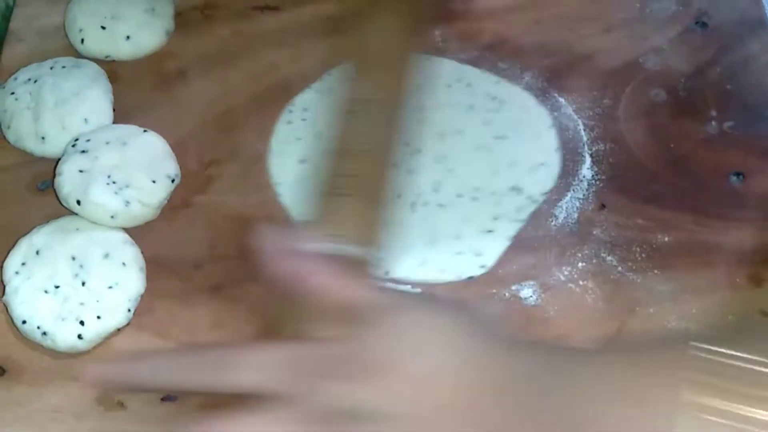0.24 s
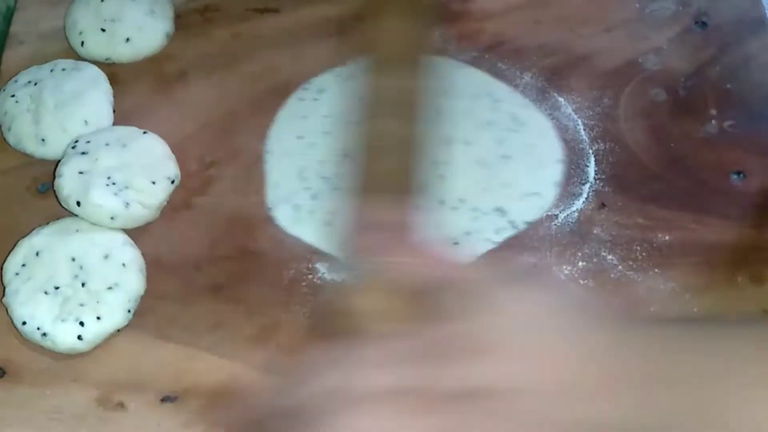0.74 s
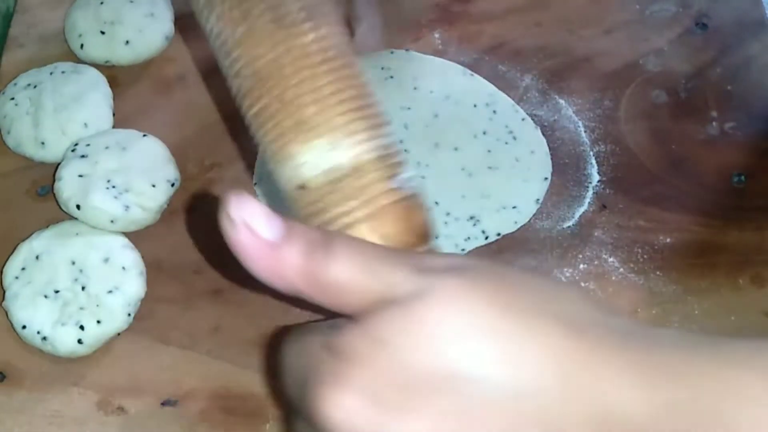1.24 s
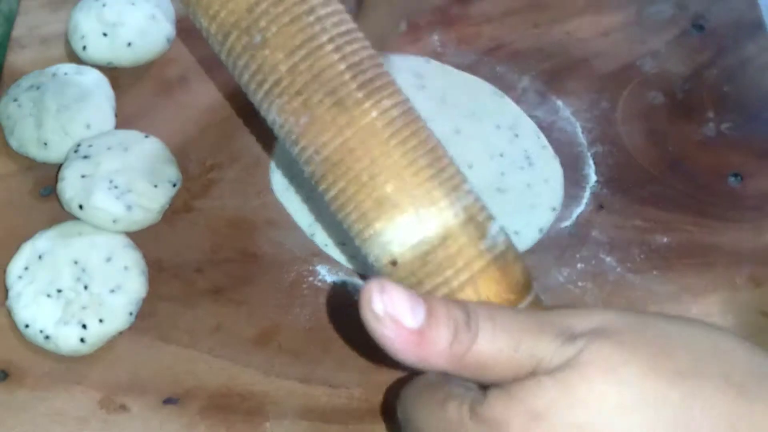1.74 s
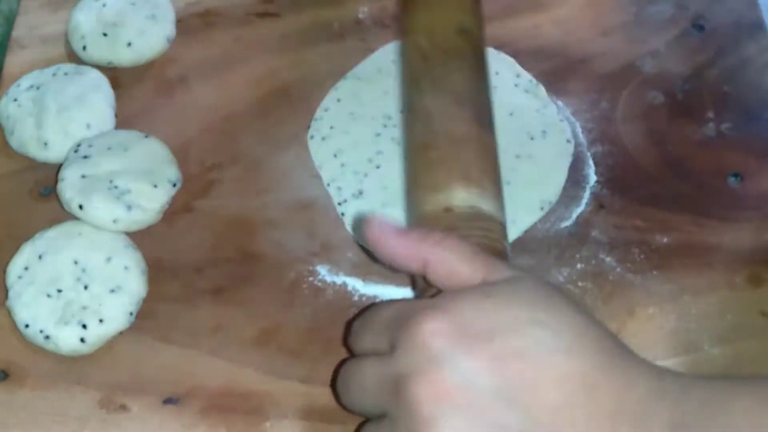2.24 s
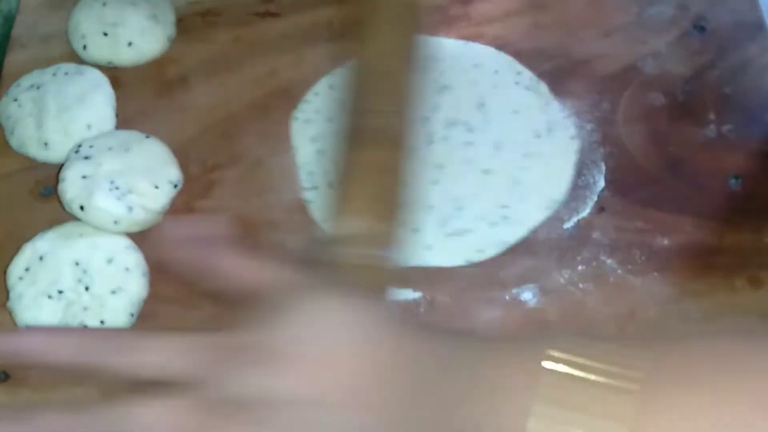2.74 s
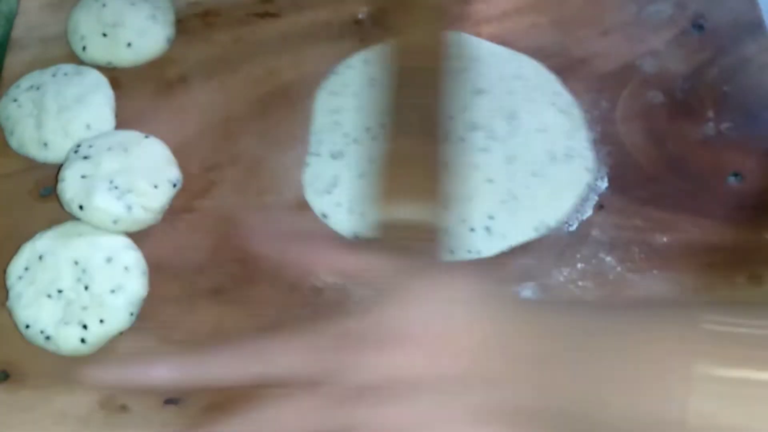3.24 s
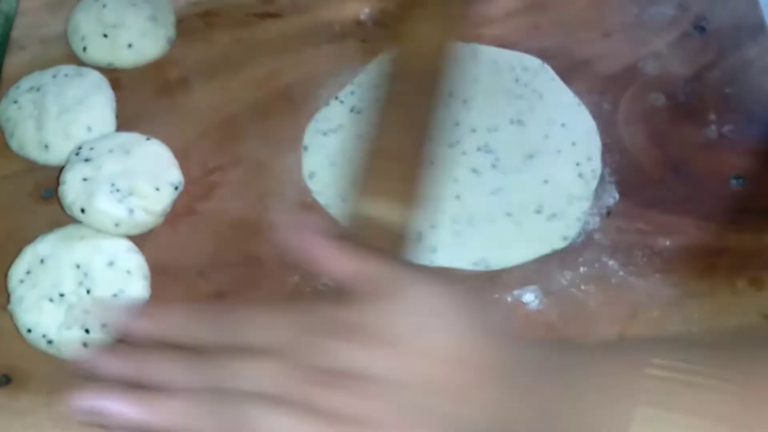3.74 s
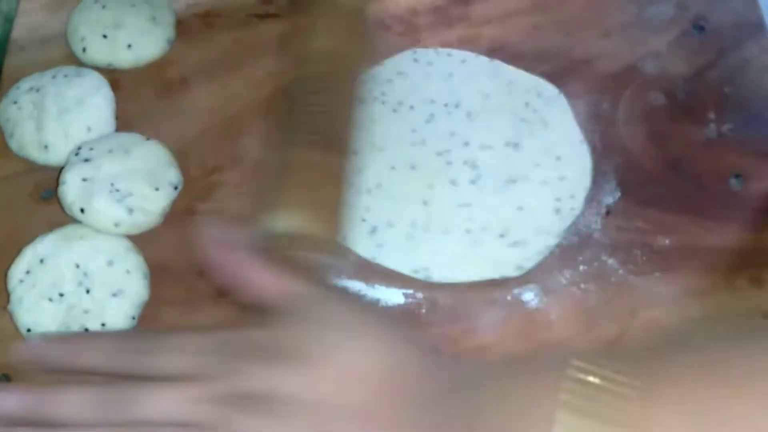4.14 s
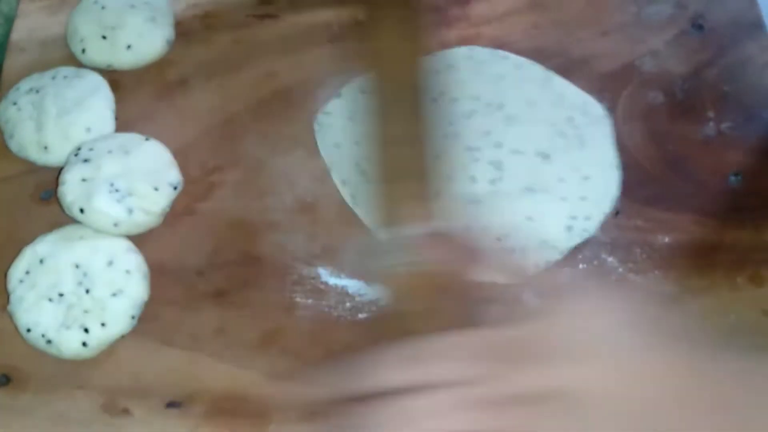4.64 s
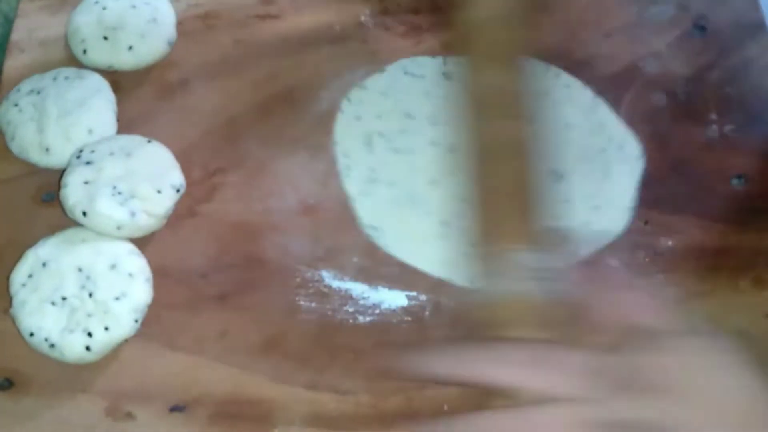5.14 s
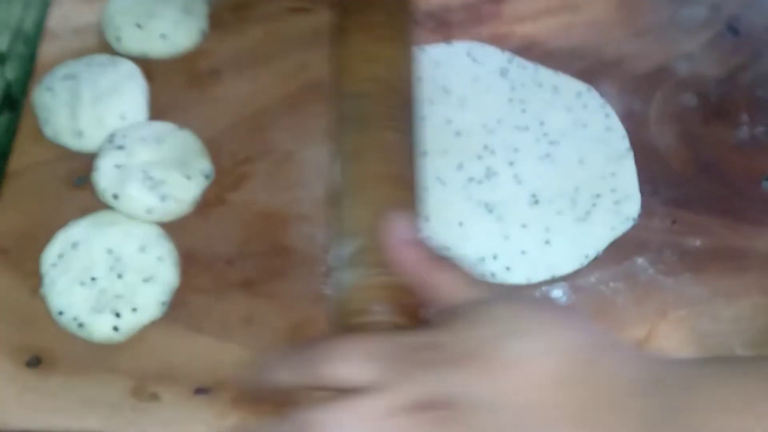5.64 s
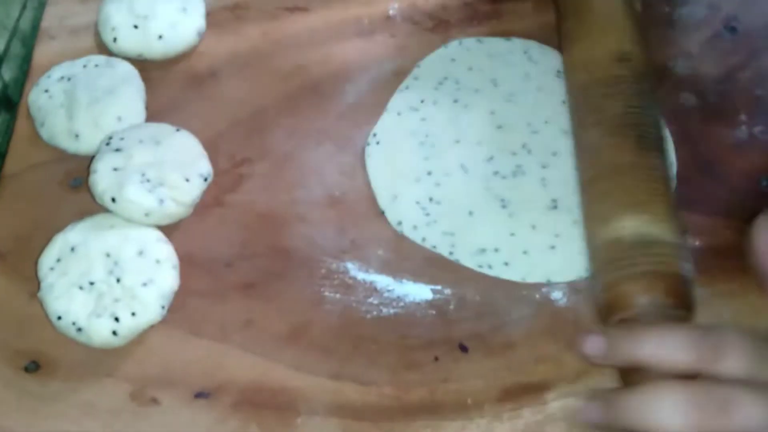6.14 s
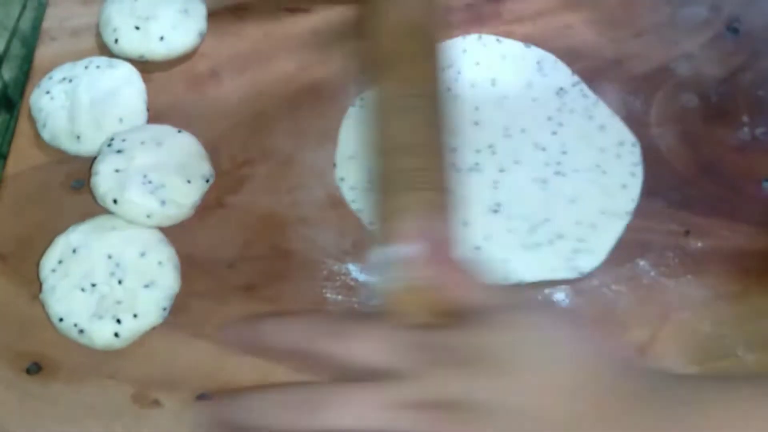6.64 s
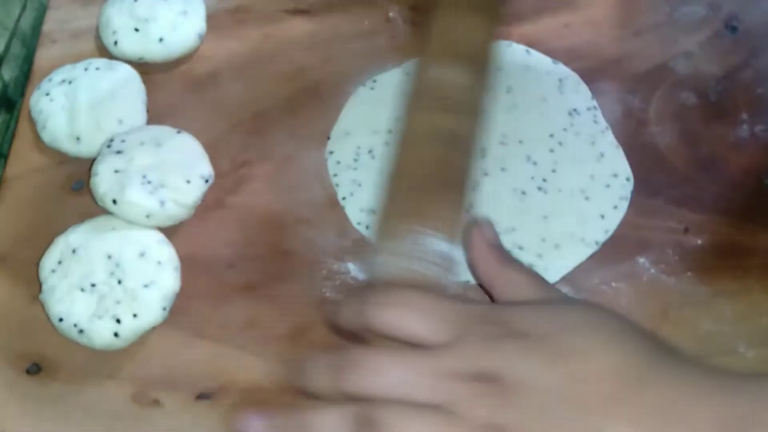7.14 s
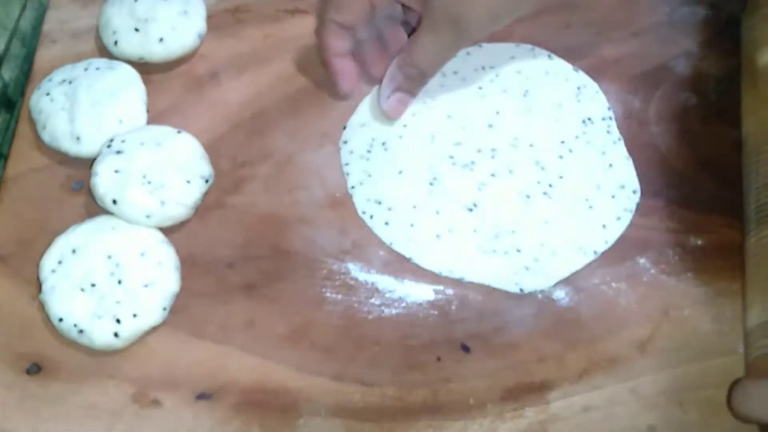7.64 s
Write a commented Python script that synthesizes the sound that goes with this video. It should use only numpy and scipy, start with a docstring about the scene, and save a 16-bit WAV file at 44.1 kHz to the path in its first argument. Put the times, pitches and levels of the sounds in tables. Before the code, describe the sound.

A wooden rolling pin works dough on a floured board, close to a phone microphone in a nearly dry home kitchen. A busy first second brings bright scrapes, palm rubbing and sharp wooden clacks over a low rumble. Soft dull bumps and tiny ticks follow, then a long quiet stretch of faint rolling, broken by short scrapes and a knock. Gentle high flour swishes swell late, and light clacks come near the end over thin hiss.

```python
"""A ribbed wooden rolling pin flattens dough on a floured board, heard close up.
First come quick dry scrapes (slip noise), palm pushes (grainy noise), clacks and knocks (damped rings).
Soft low bumps follow, with light ticks and one rustle of crumbs; a few scrapes and clacks return later.
Gentle strokes then swell high and soft (shaped noise), and a last push and clacks come near the end.
Low rumbles of rolling, faint sinking swishes and a thin steady hiss lie beneath."""
import sys
import numpy as np
from scipy import signal
from scipy.fft import rfft, irfft, next_fast_len
from scipy.io import wavfile
from scipy.ndimage import uniform_filter1d, map_coordinates

SR = 44100
rng = np.random.default_rng(int(sys.argv[2]) if len(sys.argv) > 2 else 0)


def output_pcm(signal):
    """Save a mono or channel-first signal as 16-bit PCM at the path in sys.argv[1].

    Samples are clipped to [-1, 1] before scaling.
    """
    pcm = np.clip(np.atleast_2d(signal).T, -1, 1) * 32767
    wavfile.write(sys.argv[1], SR, np.round(pcm).astype(np.int16))


N = 347067  # samples
TIME_S = np.arange(N) / SR


def amp(db):
    """Decibels to gain."""
    return 10 ** (np.asarray(db) / 20)


def unit(x):
    """Scale to rms 1."""
    return x / np.sqrt(np.mean(x ** 2) + 1e-20)


def noise():
    """White noise for the whole scene."""
    return rng.standard_normal(N)


def wobble(rate_hz):
    """Smooth random curve through rate_hz knots a second."""
    knots = rng.standard_normal(int(N * rate_hz / SR) + 4)
    return map_coordinates(knots, [np.arange(N) * rate_hz / SR])


def filtered(x, response):
    """x times a zero-phase response of frequency."""
    m = next_fast_len(N + SR // 2)
    return irfft(rfft(x, m) * response(np.fft.rfftfreq(m, 1 / SR)), m)[:N]


def coloured(x, spectrum):
    """x shaped by (Hz, dB) points on a log frequency axis, at rms 1."""
    f, db = np.transpose(spectrum)
    return unit(filtered(x, lambda hz: amp(np.interp(np.log(hz + 1), np.log(f), db))))


def band(x, hz, ratio):
    """Band-pass from hz / ratio to hz * ratio."""
    ratio = max(ratio, 1.02)
    edges_hz = [hz / ratio, min(hz * ratio, 0.45 * SR)]
    return signal.sosfilt(signal.butter(2, edges_hz, "bandpass", fs=SR, output="sos"), x)


def split(x, edge_hz):
    """The parts of x below and above an edge."""
    low = filtered(x, lambda hz: 1 / (1 + (hz / edge_hz) ** 4))
    return low, x - low


def patchy(x, depth_db):
    """Uneven surfaces: the colour of the noise drifts in small patches of time and frequency."""
    z = signal.stft(x, nperseg=1024)[2]
    field = uniform_filter1d(rng.standard_normal(z.shape), size=4, axis=0)
    field = uniform_filter1d(field, size=5, axis=1)
    return unit(signal.istft(z * amp(depth_db * unit(field)), nperseg=1024)[1][:N])


def slips(rate_hz, spread_db):
    """Tiny stick-slip impulses at random moments and of uneven size, at rms 1."""
    hits = rng.random(N) < rate_hz / SR
    size = amp(spread_db * rng.uniform(-1.5, 1, N))
    return unit(hits * noise() * size)


def ring(t, hz, cycles):
    """Heavily damped swing of peak 1; its envelope crests after the given number of cycles."""
    u = t * hz / cycles
    swing = u * np.exp(-u) * np.sin(2 * np.pi * hz * t)
    return swing / np.abs(swing).max()


def add(track, s, sound):
    """Mix a sound in at a time in seconds."""
    part = track[round(s * SR):][:len(sound)]
    part += sound[:len(part)]


def kitchen(x):
    """The short answer of the room: a decaying noise tail."""
    t = np.arange(SR // 2) / SR
    tail = rng.standard_normal(len(t)) * amp(-60 * t / 0.11)
    return signal.fftconvolve(x, tail / np.linalg.norm(tail))[:N]


# Spectrum of the hiss. Each row: frequency in Hz, relative density in dB.
HISS_SPECTRUM = [(200, -20), (1900, -31), (2250, -23.5), (2520, -4.5), (2950, -30.5), (3400, -11),
                 (3850, 2.5), (5200, 2.5), (5650, -33.5), (6400, -21), (7200, 1.5), (9200, -6),
                 (10200, -32), (15500, -40.5)]
# Gain of the narrow band near 2.5 kHz, before its wobble. Each row: time in seconds, gain in dB.
NARROW_GAIN = [(2.1, 11), (2.6, 1.5), (3.75, 2), (3.95, -11), (4.65, -11), (4.85, -1), (5.8, -1),
               (5.9, -13), (6.5, -7.5), (6.65, -1.5), (7.8, 1.5)]
HISS_DB, UPPER_GAIN_DB = -63, 1.5
UPPER_DROP_S, UPPER_DROP_DB = 4.6, -5.5


def background():
    """Thin hiss: a steady main band, an upper one that steps down, a narrow one that comes and goes."""
    hiss = patchy(coloured(noise(), HISS_SPECTRUM), depth_db=1.84)
    narrow = filtered(hiss, lambda hz: (hz > 2150) & (hz < 2950))
    upper = filtered(hiss, lambda hz: (hz > 5900) & (hz < 10500))
    main = hiss - narrow - upper
    narrow_db = np.interp(TIME_S, *np.transpose(NARROW_GAIN)) + 1.1 * wobble(22)
    upper_db = UPPER_GAIN_DB + UPPER_DROP_DB * (TIME_S > UPPER_DROP_S)
    return amp(HISS_DB) * (main + amp(upper_db) * upper + amp(narrow_db) * narrow)


# Faint swishes. Each row: crest in seconds, rise and fall in seconds (to 1/e), level in dB
# before the flutter, resonance at the crest in Hz.
SWISH_EVENTS = [(1.599, 0.64, -74.5, 2510), (2.938, 0.22, -68.5, 2450), (3.4, 0.13, -74, 1920),
                (4.106, 0.14, -66, 2840), (5.061, 0.12, -70.5, 2930), (5.303, 0.09, -77, 1780),
                (5.432, 0.039, -72.5, 600), (6.772, 0.039, -68.5, 8700), (6.92, 0.084, -59, 2956),
                (7.059, 0.16, -67.5, 2280)]
SWISH_BELOW_OCTAVES, SWISH_ABOVE_OCTAVES = 0.067, 0.75  # steep lower side, soft upper side
RESONANCE_DB, RESONANCE_OCTAVES = -5.5, 0.017  # strength, half width
SINK_OCTAVES, LEVELS_OFF_LENGTHS = 0.12, 0.25  # fall per swish length, lengths past the crest


def swishes():
    """A fluttering noise band stands on a narrow resonance, which sinks and then levels off."""
    out = np.zeros(N)
    crest_s = 1  # within a two-second burst
    burst_t = np.arange(2 * SR) / SR
    for s, length_s, db, resonance_hz in SWISH_EVENTS:
        hz, t, z = signal.stft(rng.standard_normal(2 * SR), SR, nperseg=1024)
        sunk = SINK_OCTAVES * np.clip((t - crest_s) / length_s, -2, LEVELS_OFF_LENGTHS)
        octaves = np.log2((hz[:, None] + 1) / resonance_hz) + sunk
        side = np.where(octaves < 0, SWISH_BELOW_OCTAVES, SWISH_ABOVE_OCTAVES)
        resonance = amp(RESONANCE_DB) * np.exp(-(octaves / RESONANCE_OCTAVES) ** 2)
        shape = np.exp(-(octaves / side) ** 2) + resonance
        burst = unit(signal.istft(z * shape, SR, nperseg=1024)[1][:2 * SR])
        swell = np.exp(-((burst_t - crest_s) / length_s) ** 2)
        add(out, s - crest_s, amp(db) * burst * swell)
    return out * amp(1.8 * wobble(40))


# Rolls of the pin. Each row: start of full weight in seconds, hold in seconds,
# weight in dB (relative), easing in dB per second.
ROLL_EVENTS = [(0, 0.95, -52.5, 9.5), (1.748, 0.29, -57.5, 16.5), (3.324, 0.18, -76, 141),
               (3.795, 0.053, -60.5, 249), (3.88, 0.11, -73.5, 19.5), (4.473, 0.072, -62, 146.5),
               (4.899, 0.14, -81, 27), (5.729, 0.021, -73, 160.5), (6.536, 0.058, -72.5, 33),
               (7.709, 0.11, -79.5, 30.5)]
# Spectrum of the rumble. Each row: frequency in Hz, relative density in dB.
RUMBLE_SPECTRUM = [(20, -23.5), (40, -18.5), (62, 1), (130, -0.5), (230, 0), (340, -7), (520, -31),
                   (1700, -66)]
# Lowest board resonances, stirred by the rolling. Each row: frequency in Hz, relative level in dB.
BOARD_HUMS = [(78, -11), (126, -5), (182, -10.5)]
PRESS_S = 0.025  # Gaussian onset of the weight
MID_DB_PER_DB, TOP_DB_PER_DB = 0.5, 0.7  # extra gain per dB of weight; the top gets both


def rolling():
    """The pin rumbles over the dough; light pressure leaves mostly the deepest part."""
    weight = np.zeros(N)
    for start_s, hold_s, db, easing_db_per_s in ROLL_EVENTS:
        press = np.exp(-(np.minimum(TIME_S - start_s, 0) / PRESS_S) ** 2)
        eased_db = db - easing_db_per_s * np.maximum(TIME_S - start_s - hold_s, 0)
        weight = np.maximum(weight, press * amp(eased_db))
    hums = sum(amp(db) * unit(band(noise(), hz, ratio=1.025)) for hz, db in BOARD_HUMS)
    rumble = coloured(slips(rate_hz=1100, spread_db=-1.0), RUMBLE_SPECTRUM)
    deep, upper = split(rumble + hums, edge_hz=135)
    middle, top = split(upper, edge_hz=53)
    pressure = weight / weight.max()
    lifted = pressure ** MID_DB_PER_DB * (middle + pressure ** TOP_DB_PER_DB * top)
    return amp(3.0 + 2.6 * wobble(12)) * weight * (deep + lifted)


# Gentle passes over the floured dough. Each row: crest in seconds, level in dB.
PASS_EVENTS = [(4.98, -70), (5.42, -70.5), (5.81, -69.5), (6.24, -67.5), (6.621, -61.5), (6.85, -65.5)]
# Spectrum of brushed flour. Each row: frequency in Hz, relative density in dB.
BRUSH_SPECTRUM = [(2300, -34.5), (3500, -13), (5000, -1), (5800, -11.5), (6800, 0.5), (8200, 2),
                  (9300, -16), (10500, -33)]
PASS_RISE_S, PASS_FALL_S = 0.075, 0.14


def passes():
    """Each gentle pass brushes the flour: a soft high swell, quick to come and slow to leave."""
    swell = np.zeros(N)
    for crest_s, db in PASS_EVENTS:
        span_s = np.where(TIME_S < crest_s, PASS_RISE_S, PASS_FALL_S)
        swell += amp(db) * np.exp(-((TIME_S - crest_s) / span_s) ** 2)
    return swell * patchy(coloured(noise(), BRUSH_SPECTRUM), depth_db=4.0)


# Crumbs, as the pin is turned in the hand. Each row: middle in seconds, half length in seconds, level in dB.
RUSTLE_EVENTS = [(1.9, 0.063, -75.5)]
CRUMBS_PER_S = 550


def rustles():
    """Dry crumbs rustle softly between hand, pin and board: band-passed random slips."""
    level = sum(amp(db) * np.exp(-((TIME_S - s) / half_s) ** 4) for s, half_s, db in RUSTLE_EVENTS)
    return level * unit(band(slips(CRUMBS_PER_S, spread_db=5.5), hz=970, ratio=1.7))


# Light dry touches. Each row: time in seconds, peak in dB, centre in Hz.
TICK_EVENTS = [(0.2325, -28.5, 5000), (1.956, -41.5, 1310), (1.98, -46, 1470), (3.793, -23.5, 4300),
               (4.289, -26, 4600), (4.484, -34.5, 6760), (5.319, -60, 1504), (5.42, -53.5, 690),
               (5.745, -36, 4760), (7.339, -48.5, 3230), (7.391, -27.5, 5050), (7.402, -33, 4800),
               (7.4123, -29, 4800), (7.7733, -34.5, 4600)]
TICK_T60_S, TICK_BAND_RATIO = 0.0085, 1.43


def ticks():
    """A light touch is a tiny noise burst that dies at once and does not shake the board."""
    out, t = np.zeros(N), np.arange(SR // 30) / SR
    for s, db, hz in TICK_EVENTS:
        burst = rng.standard_normal(len(t)) * amp(-60 * t / TICK_T60_S)
        burst = band(burst, hz, TICK_BAND_RATIO)
        burst = band(burst, hz, ratio=2.23)  # steeper skirts
        add(out, s, amp(db) * burst / np.abs(burst).max())
    return out


# Soft bumps as the pin is pressed and turned in the hand. Each row: time in seconds,
# strength in dB before filtering.
BUMP_EVENTS = [(0.022, -21), (0.971, -20.5), (1.311, -34), (1.38, -37), (1.428, -31), (1.494, -40),
               (1.526, -39.5), (1.613, -41.5), (1.779, -40.5), (1.79, -36), (1.844, -38), (1.914, -39),
               (2.041, -40), (2.1, -39.5), (2.151, -39.5), (2.845, -53), (4.365, -57.5), (5.742, -56.5),
               (6.53, -57)]
# Spectrum of the skin's brush. Each row: frequency in Hz, relative density in dB.
SKIN_SPECTRUM = [(400, -5.5), (1500, -17.5), (2600, -8.5), (4300, 8.5), (5700, -17), (8000, 7),
                 (9500, -2.5), (11000, -33)]
BUMP_TOP_HZ, BUMP_HZ_PER_DB = 1340, 17.5  # upper edge at 0 dB, and its drop per dB softer


def bumps():
    """Cushioned contacts: one low swing, duller when light, and a faint brush of skin."""
    out, touch = np.zeros(N), np.zeros(N)
    t = np.arange(SR // 20) / SR
    for s, db in BUMP_EVENTS:
        top_hz = np.clip(BUMP_TOP_HZ + BUMP_HZ_PER_DB * db, 200, 2000)
        cushion = signal.butter(4, top_hz, fs=SR, output="sos")
        swing = -amp(db) * ring(t, hz=193.5, cycles=0.22)
        add(out, s - 0.001, signal.sosfilt(cushion, swing))
        onset = 1 - np.exp(-(t / 0.0009) ** 2)
        add(touch, s - 0.002, amp(db - 60 * t / 0.032) * onset)
    brush = touch * coloured(noise(), SKIN_SPECTRUM)
    return band(out, hz=164.8, ratio=4.6) + amp(-8.5) * brush


# Wood meeting wood. Each row: time in seconds, snap level in dB, snap pitch in Hz,
# knock level in dB, knock pitch in Hz, knock swell in cycles.
CLACK_EVENTS = [(0.1415, -34, 3950, -24.5, 580, 0.12), (0.2355, -34, 5400, -30, 810, 0.5),
                (0.2545, -11.5, 5790, -20, 890, 0.33), (0.2578, -18.5, 5020, -21.5, 1113, 0.35),
                (0.2602, -6.5, 4760, -27, 487, 0.13), (.2638, -11, 5600, -15.5, 593, 0.098),
                (0.2706, -24, 3420, -29, 810, 0.26), (0.4997, -6.5, 3740, -20, 975, 0.76),
                (0.7445, -23, 4000, -19, 700, 0.4), (0.7469, -17.5, 2218, -15.5, 700, 0.15),
                (0.8605, -29, 5120, -24.5, 994, 0.22), (0.9516, -6.5, 3988, -16.5, 1120, 0.38),
                (0.9649, -15.5, 3070, -4, 1080, 0.2), (1.1361, -7.5, 4500, -21, 427, 0.14),
                (1.168, -15, 6360, -17.5, 533, 0.072), (4.446, -35, 3520, -13, 458, 0.15),
                (7.386, -25.5, 4580, -42, 673, 0.39), (7.4259, -19.5, 6060, -36.5, 1160, 0.41),
                (7.4419, -17, 5500, -41.5, 660, 0.42)]
# Modes of the pin. Each row: frequency in Hz, mean relative level in dB.
PIN_MODES = [(2550, -6.5), (3650, -5.5), (4550, -0.5), (6050, -2.5), (7500, -3)]
PIN_T60_S, PIN_REACH_OCTAVES = 0.013, 0.8  # damped by the hand; a snap rings modes near its pitch
RING_DB, RING_DB_PER_DB = -24.5, 1  # ring gain at a 0 dB snap, and its rise per dB of snap


def pin_ring(t, snap_hz):
    """Damped modes of the pin, weighted by closeness to the snap's pitch."""
    out = np.zeros(len(t))
    for hz, db in PIN_MODES:
        decay = amp(db + rng.normal(0, 2) - 60 * t / PIN_T60_S)
        reach = np.exp(-(np.log2(hz / snap_hz) / PIN_REACH_OCTAVES) ** 2 / 2)
        out += decay * reach * np.sin(2 * np.pi * (hz * t + rng.random()))
    return band(out, hz=4500, ratio=2)


def clacks():
    """Sharp snap, brief ring of the pin, and a knock of the board that dough and hand soon stop."""
    out, t = np.zeros(N), np.arange(SR // 30) / SR
    for s, snap_db, snap_hz, knock_db, knock_hz, cycles in CLACK_EVENTS:
        crack = rng.standard_normal(len(t)) * amp(-60 * t / 0.005)
        width = 3.5 + 0.045 * snap_db  # harder contacts are shorter, so wider in band
        snap = band(ring(t, snap_hz, cycles=0.519) + 0.5 * crack, snap_hz, ratio=width)
        edge = amp(-3.5 + 0.42 * snap_db) * ring(t, hz=10500, cycles=0.1)  # finer when harder
        snap += band(edge, hz=10460, ratio=1.3)
        knock = ring(t, knock_hz, cycles) + 0.13 * ring(t, knock_hz * 0.42, cycles)
        knock = band(knock, knock_hz, ratio=2.0)
        knock += 0.18 * ring(t, knock_hz * 2.0, cycles)  # board overtone
        pin = amp(RING_DB + RING_DB_PER_DB * snap_db) * pin_ring(t, snap_hz)
        add(out, s, amp(snap_db) * snap + pin + amp(knock_db) * knock)
    return out


# Pushes of the palm. Each row: start of full grip in seconds, length in seconds, level in dB
# before the wobble, brightness in dB, bass in dB.
PUSH_EVENTS = [(0.13, 0.23, -49, 1, -4), (0.411, 0.42, -43, 0.5, -1), (0.829, 0.21, -43, -11, 1.5),
               (1.04, 0.28, -50, -5, -13), (3.807, 0.056, -50.5, 3, -2), (4.455, 0.12, -51, -8.5, -7),
               (7.435, 0.064, -52.5, 0.5, -15.5)]
# Spectrum of skin on wood. Each row: frequency in Hz, relative density in dB.
PALM_SPECTRUM = [(130, -40), (230, -10), (350, 6.5), (550, 4.5), (900, -5.5), (2200, -8.5), (4100, -1),
                 (5600, -6), (7800, -0.5), (9500, -5.5), (10800, -13), (15500, -16)]
GRIP_S = 0.043  # build-up before the start
LET_GO_DB, TRAIL_DB_PER_S = -12, 376.5  # drop at the end, then trail
RIBS_PER_S, RIBS_DB = 24, -13  # random patter, level relative to the bass


def palm():
    """Skin drags on ribbed wood with an unsteady grip; crumbs crackle and ribs patter under it."""
    skin = coloured(slips(rate_hz=9000, spread_db=2.0), PALM_SPECTRUM)
    dull, bright = split(patchy(skin, depth_db=1.0), edge_hz=9400)
    bass, dull = split(dull, edge_hz=870.0)
    crumbs = unit(band(slips(rate_hz=60, spread_db=2.5), hz=2500, ratio=6.7))
    ribs = unit(band(slips(RIBS_PER_S, spread_db=0.5), hz=810, ratio=1.3))
    low = bass + amp(RIBS_DB) * ribs
    out = np.zeros(N)
    for start_s, length_s, db, bright_db, bass_db in PUSH_EVENTS:
        past_s = TIME_S - start_s - length_s
        release_db = np.where(past_s > 0, LET_GO_DB - TRAIL_DB_PER_S * past_s, 0)
        grip = np.clip((TIME_S - start_s) / GRIP_S + 1, 0, 1) * amp(release_db)
        rub = dull + amp(bright_db) * bright + amp(bass_db) * low + amp(-18.0) * crumbs
        out += uniform_filter1d(grip, size=200) * amp(db) * rub
    return out * amp(1.2 * wobble(70))


# Quick scrapes of the pin. Each row: crest in seconds, rise in seconds, fall in seconds, level in dB,
# brightness (bright over dull part) in dB, board share in dB relative to the level.
SCRAPE_EVENTS = [(0.029, 0.031, 0.034, -28, 13.5, -10), (0.108, 0.0015, 0.0047, -43, 3, -5.5),
                 (.185, 0.036, 0.028, -38, -6, -8), (0.257, 0.026, 0.01, -30.5, 3, -11.5),
                 (0.336, 0.001, 0.01, -41, 3, -7.5), (0.387, 0.006, 0.0093, -42, -9, -9.5),
                 (0.723, 0.023, 0.021, -28.5, 11, -10), (0.727, 0.006, 0.0051, -24, 5, -3),
                 (0.752, 0.016, 0.025, -24, 19.5, -13), (0.776, 0.0076, 0.03, -24, 7.5, -12),
                 (0.968, 0.04, 0.0097, -35.5, -3, 2.5), (.993, 0.0066, 0.013, -40, -25.5, -5),
                 (1.136, 0.021, 0.002, -30.5, 2, -13), (1.97, 0.035, 0.031, -71.5, -10, 12),
                 (3.784, 0.017, 0.027, -36.5, -0.5, -21), (4.441, 0.012, 0.004, -41, -3.5, -49),
                 (4.452, 0.0036, 0.019, -36.5, 9.5, 3.5), (4.499, 0.0057, 0.0073, -50.5, 0, 5.5),
                 (7.39, 0.009, 0.036, -45, -6, -20.5)]
# Spectrum of wood on flour. Each row: frequency in Hz, relative density in dB.
FLOUR_SPECTRUM = [(700, -25.5), (1500, -11), (2600, -11), (4000, -1.5), (5300, -5.5), (7500, -3),
                  (9300, -6.5), (10500, -12), (15500, -18)]
# Spectrum of the shaken board. Each row: frequency in Hz, relative density in dB.
BOARD_SPECTRUM = [(90, -35.5), (170, -25), (280, 4), (450, 2), (900, -2), (1600, -4), (2600, -9),
                  (5000, -35.5)]


def scrapes():
    """Wood skids over flour: dense slips hiss, dull or bright by stroke, and shake the board."""
    flour = coloured(slips(rate_hz=30000, spread_db=3.5), FLOUR_SPECTRUM)
    dull, bright = split(patchy(flour, depth_db=4.5), edge_hz=6140)
    board = patchy(coloured(slips(rate_hz=20000, spread_db=1.5), BOARD_SPECTRUM), depth_db=1.5)
    power = np.zeros((3, N))  # overlapping strokes add in power
    for crest_s, rise_s, fall_s, db, bright_db, board_db in SCRAPE_EVENTS:
        near = np.abs(TIME_S - crest_s) < 4 * max(rise_s, fall_s)
        t = TIME_S[near] - crest_s
        stroke = np.exp(-(t / np.where(t < 0, rise_s, fall_s)) ** 2)
        gains = amp([[db - bright_db / 2], [db + bright_db / 2], [db + board_db]])
        power[:, near] += (gains * stroke) ** 2
    return np.sum(np.sqrt(power) * [dull, bright, board], axis=0)


def scene():
    """Everything lies within arm's reach, so the sound is nearly dry."""
    near = scrapes() + palm() + clacks() + ticks() + bumps() + rustles() + rolling() + passes()
    return (near + amp(-18.5) * kitchen(near) + swishes() + background())[None]


TOP_HZ = 15800


def record(dry):
    """Steep band limit of the phone that picks up the sound."""
    return filtered(dry[0], lambda hz: 1 / (1 + (hz / TOP_HZ) ** 120))[None]


dry = scene()
out = record(dry)
output_pcm(out)
```